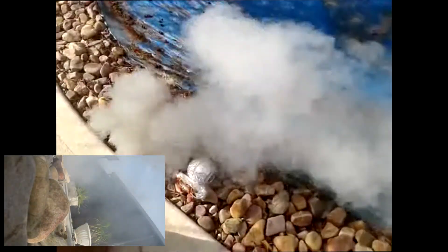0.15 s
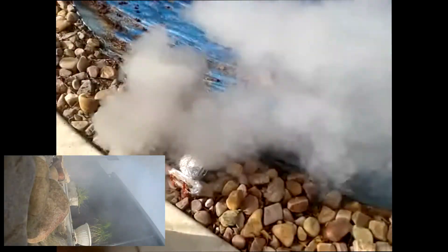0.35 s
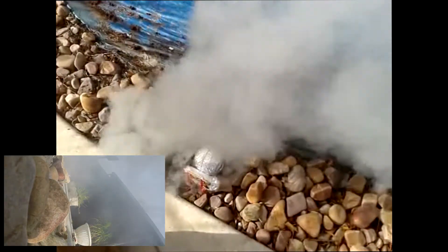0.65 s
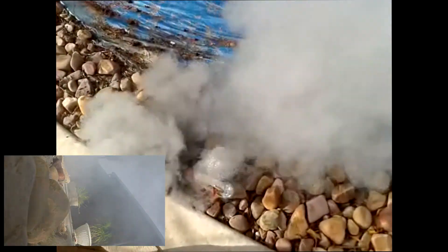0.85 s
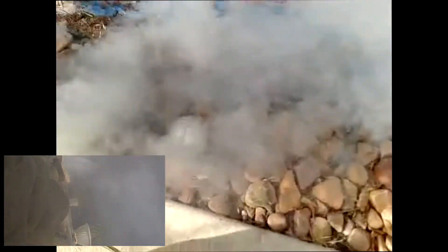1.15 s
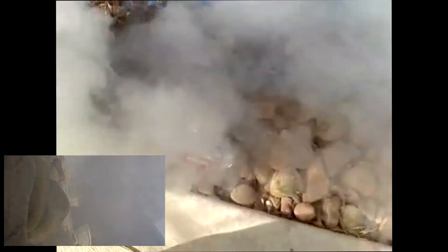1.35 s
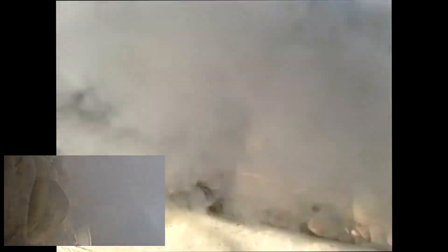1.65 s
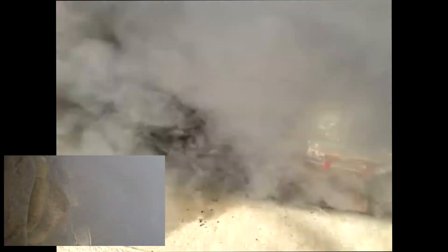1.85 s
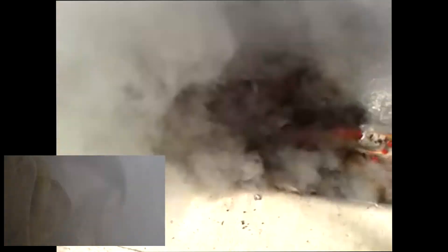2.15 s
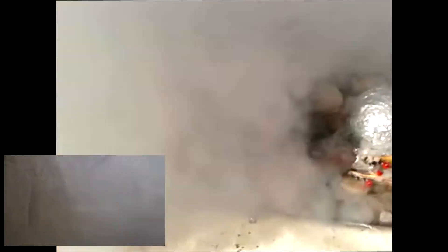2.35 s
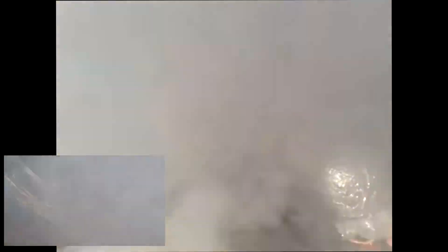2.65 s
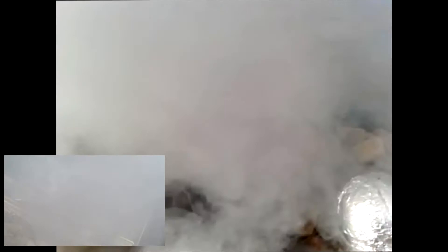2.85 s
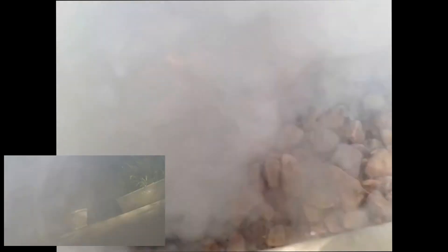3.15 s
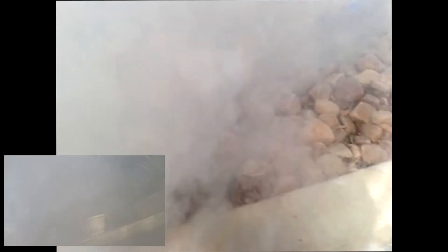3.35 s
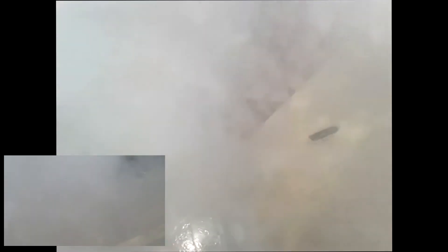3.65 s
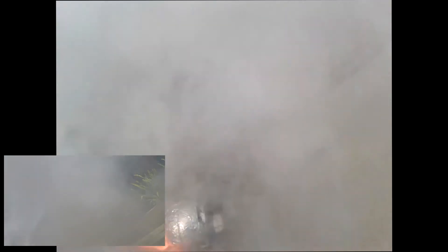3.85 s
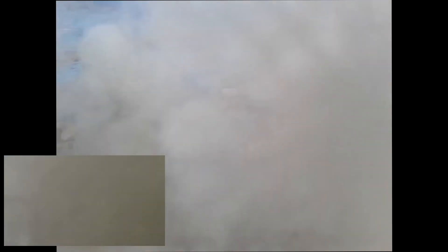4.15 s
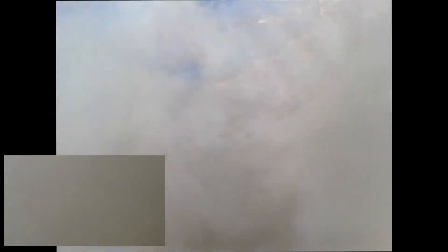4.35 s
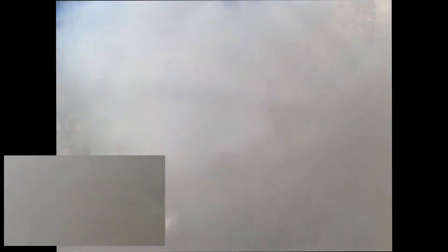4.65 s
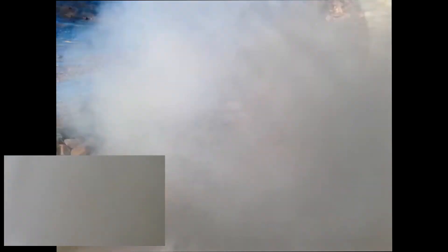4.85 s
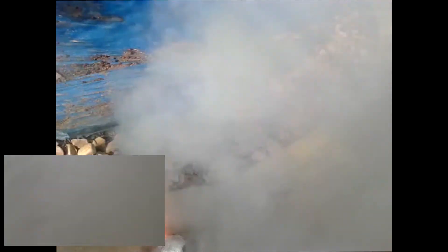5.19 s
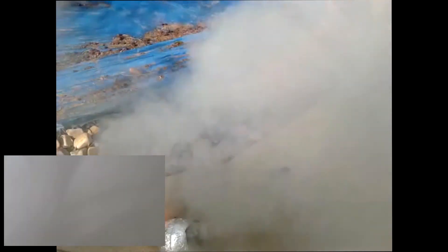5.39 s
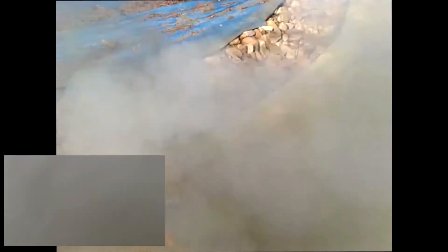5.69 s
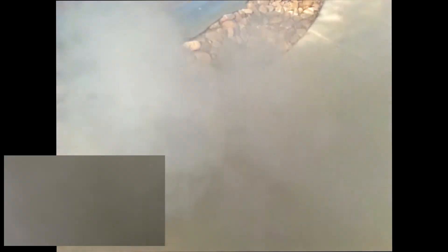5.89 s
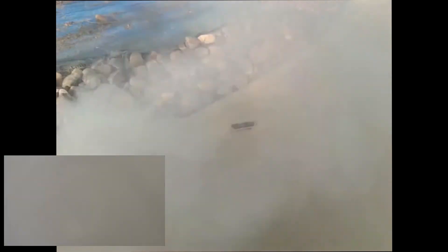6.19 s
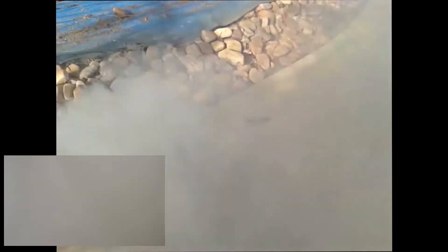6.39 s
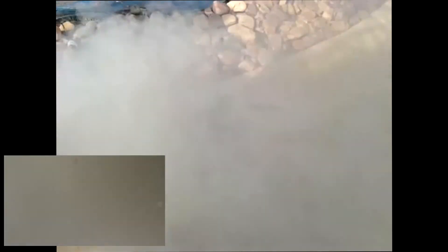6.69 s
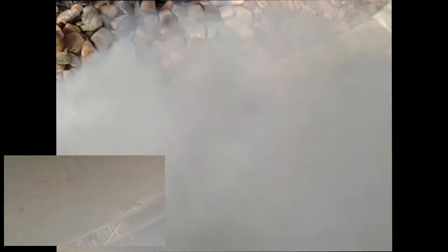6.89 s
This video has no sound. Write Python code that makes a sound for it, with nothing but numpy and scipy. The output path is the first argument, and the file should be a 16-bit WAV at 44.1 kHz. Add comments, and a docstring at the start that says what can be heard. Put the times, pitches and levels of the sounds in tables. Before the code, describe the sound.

A homemade solid-fuel motor roars with rough, grainy hiss near one microphone, dry and outdoors. At first it is even and moderate; then quick spurts, scrapes and wooden bumps break in. Around three seconds a heavy thumping lurch makes it much louder. It keeps blasting with changing hollow or piercing colour and rumbling wheels, then bursts in a hard pop and collapses to a faint, spitting hiss.

```python
"""First comes the hiss of a small solid-fuel rocket motor beside one microphone: crackling noise, coloured
by echoes off paving and stones that change as the board carrying the motor lurches about.
The board rumbles and grinds (shaped noise), scrapes over stone and knocks (short decaying swings).
At the end the motor pops (shaped pressure pulses with a bright noise crack), the jet collapses, and a weak
hiss with a few faint spits (tiny noise bursts) is left."""
import sys
import numpy as np
from scipy import signal
from scipy.fft import rfft, irfft
from scipy.io import wavfile
from scipy.ndimage import uniform_filter1d

SR = 44100
rng = np.random.default_rng(int(sys.argv[2]) if len(sys.argv) > 2 else 0)


def how_loud(loudness_db):
    """Turn decibels into a plain amplitude multiplier (0 dB gives 1, 20 dB gives 10)."""
    steps = np.asarray(loudness_db, float) / 20
    return 10 ** steps


def unload_audio(sound):
    """Save the sound as a 16-bit wav file, at the path given as the first command line argument."""
    columns = np.transpose(np.atleast_2d(sound))
    # keep every value between -1 and 1, then stretch to whole-number steps
    steps = np.round(np.clip(columns, -1, 1) * 32767)
    wavfile.write(sys.argv[1], SR, steps.astype(np.int16))


N = 310023


def jet(flutter_db=0.67, swell_db=0.35, crackle_per_s=350, crackle_db=2.5, spread_db=3.0, patchy_db=0.77):
    """Turbulent gas makes noise with sharp crackle, heard through the reflections of each place in turn."""
    # where the motor stands: move_centre_s, move_time_s, tilt_db_per_octave (as the nozzle turns),
    # casing_share, nozzle_share (how much of each ring is heard)
    places = [(0, .1, -1.85, .3, 0.078), (1.35, 0.78, -1.1, 0, 0.31), (2.3, 0.22, -0.03, 0.32, 0),
              (3.07, 0.049, 0.54, 0.54, 0.21), (3.98, 0.21, -0.86, 0.43, 0.79), (5.2, 0.48, -2, 0, 0.63),
              (5.73, 0.32, -1, 0.32, 1), (6.17, 0.56, -0.55, 0.97, 0.56), (6.69, 0.053, 0.2, 0, 0.2)]
    # strongest reflections near each place, one list a place: delay_ms, signed_strength, top_hz
    reflections = [
        [(0.233, 0.3, 9400), (0.37, 0.64, 1210), (0.473, -0.22, 19000), (0.767, 0.062, 19000),
         (0.803, -0.15, 6900), (0.966, 0.097, 6800), (1.474, 0.18, 8600), (1.571, -0.2, 2040),
         (1.929, -0.29, 1210), (3.207, 0.33, 1200)],
        [(0.243, 0.31, 1200), (0.477, -0.28, 19000), (0.515, 0.26, 4800), (0.681, -0.17, 19000),
         (0.744, 0.17, 19000), (0.977, 0.76, 1200), (1.249, 0.19, 5000), (1.47, 0.68, 1800),
         (1.801, 0.67, 1200), (1.903, -0.53, 1300)],
        [(0.086, 0.48, 3460), (0.223, 0.13, 6800), (0.398, -0.071, 19000), (0.698, -0.2, 5000),
         (0.813, -0.23, 1700), (0.9, 0.29, 4000), (1.167, 0.3, 1400), (1.47, 0.18, 4600), (1.714, 0.28, 1800),
         (2.043, -0.42, 1200)],
        [(0.068, 0.032, 4800), (0.162, -0.34, 1600), (0.351, 0.12, 19000), (0.696, -0.57, 1200),
         (0.994, -0.08, 4700), (1.673, 0.38, 1200), (1.962, 0.072, 1400), (2.136, -0.084, 1200),
         (3.182, 0.22, 1200), (3.593, 0.11, 1600)],
        [(0.078, 0.18, 2500), (0.313, 0.52, 1530), (0.493, 0.3, 12500), (0.653, 0.089, 19000),
         (0.854, 0.33, 1200), (1.169, -0.059, 19000), (1.945, 0.37, 1700), (2.478, 0.32, 1300),
         (2.758, -0.12, 7700), (2.968, 0.17, 1400)],
        [(0.083, -0.3, 6100), (0.186, 0.36, 19000), (0.299, -0.34, 2900), (0.404, 0.54, 1610),
         (0.66, 0.14, 7000), (1.272, -0.29, 1200), (1.554, -0.13, 3800), (1.913, 0.082, 2400),
         (2.125, -0.39, 1300), (2.544, 0.1, 2900)],
        [(0.123, -0.09, 19000), (0.183, 0.47, 8000), (0.317, -0.2, 14200), (0.565, 0.22, 19000),
         (0.698, 0.12, 7100), (1.173, 0.086, 2000), (1.904, 0.13, 3000), (2.023, 0.15, 4300),
         (2.333, -0.19, 1200), (2.496, 0.12, 2400)],
        [(0.109, -0.66, 5800), (0.216, 0.25, 19000), (0.426, 0.3, 16400), (0.443, -0.21, 1300),
         (0.697, 0.14, 19000), (1.651, -0.57, 1200), (1.931, 0.13, 3000), (2.149, -0.32, 5000),
         (2.368, -0.2, 3500), (2.699, -0.32, 2400)],
        [(0.056, 0.5, 19000), (0.131, 0.11, 5200), (0.32, 1, 1400), (0.402, 0.28, 10000), (0.7, 0.43, 2400),
         (0.77, 0.44, 2000), (0.956, -0.33, 2300), (1.088, 0.64, 1200), (1.263, -0.2, 1500),
         (1.917, 0.18, 1200)],
    ]
    gas = rng.standard_normal(N) * how_loud(flutter_db * wander(0.001) + swell_db * wander(0.012))
    crack_db = crackle_db + spread_db * np.minimum(rng.exponential(1, N), 5)
    cracks = (rng.random(N) < crackle_per_s / SR) * how_loud(crack_db)
    hz, frame_s, spectrum = signal.stft(gas + cracks, SR, nperseg=1024, noverlap=768)

    gain = 0
    for index, (place, echoes) in enumerate(zip(places, reflections)):
        centre_s, move_s, tilt_db, casing, nozzle = place
        # the first place holds from the start; each later one fades in over its move
        share = np.clip((frame_s - centre_s) / move_s + .5, 0, 1) if index else np.ones(len(frame_s))
        here = echo_path(hz, echoes, tilt_db, casing, nozzle)[:, None]
        gain = (1 - share) * gain + share * here

    # hot smoke bends the paths: patches of the spectrum drift up and down in level
    smoke = rng.standard_normal(spectrum.T.shape).T
    smoke = uniform_filter1d(smoke, size=10, axis=0)
    smoke = evened(uniform_filter1d(smoke, size=14, axis=1))
    heard = spectrum * gain * how_loud(patchy_db * smoke)
    hiss = signal.istft(heard, SR, nperseg=1024, noverlap=768)[1][:N]
    return evened(hiss) * thrust()


def thrust():
    """Jet amplitude at the microphone: the burn with its spurts, then a collapse to a weak hiss."""
    # jet strength while the fuel burns: time_s, level_db
    burn = [(0, -24.5), (1.0, -24.5), (2.05, -26), (2.4, -25), (2.75, -21.5), (3.04, -23), (3.1, -18.5),
            (3.3, -17), (3.52, -18), (3.62, -16.5), (3.97, -15), (4.06, -16.5), (5.03, -14), (5.45, -15.5),
            (5.55, -12), (5.74, -16.5), (6.2, -16), (6.65, -15)]
    # sudden changes of the jet, mostly spurts: centre_s, boost_db, fall_s
    spurts = [(2.154, 3, 0.01), (2.322, 4.5, 0.011), (2.346, 10, 0.014), (2.425, 5.5, 0.0062),
              (3.323, 6.5, 0.0094), (3.825, 3.5, 0.0045), (3.866, 3, 0.0057), (6.66, -0.5, .006)]
    burnout_s, collapse_s = 6.6625, .0015
    ember_db, ember_extra_db, ember_sink_s, ember_rise_db_per_s = -37, 9, 0.078, 10
    after = np.arange(N) / SR - burnout_s
    burning = .5 - .5 * np.tanh(after / collapse_s)
    burn_db = curve(burn) + sum(db * swell(s, fall_s) for s, db, fall_s in spurts)
    # the weak hiss sinks, then creeps up
    late = np.maximum(after, 0)
    weak_db = ember_db + ember_extra_db * np.exp(-late / ember_sink_s) + ember_rise_db_per_s * late
    return burning * how_loud(burn_db) + (1 - burning) * how_loud(weak_db)


def echo_path(hz, echoes, tilt_db, casing, nozzle):
    """Direct sound and dulled reflections interfere; tube rings and tilt colour the jet at one place."""
    # jet spectrum before rings and tilt: freq_hz, relative_density_db
    jet_spectrum = [(30, -45.), (150, -38.5), (350, -21.5), (800, -3.5), (1500, -2), (2700, -1),
                    (4500, -10), (6000, -15.5), (7500, -21), (9500, -30), (12000, -38.5), (14000, -45),
                    (15000, -58.), (15400, -100.)]
    # ring of the casing: centre_hz, width_hz, height_db (at full share)
    casing_ring = (1093, 99, 14.7)
    # rings of the nozzle: centre_hz, width_hz, height_db (at full share)
    nozzle_rings = [(2206, 200, 15.5), (2863, 540, 11), (4577, 400, 11), (6140, 700, 8)]
    comb = 1
    for delay_ms, strength, top_hz in echoes:
        comb = comb + strength * np.exp(-2j * np.pi * hz * delay_ms / 1000) / (1 + 1j * hz / top_hz)
    rings = [casing_ring] + list(nozzle_rings)
    casing_db, *nozzle_db = (db / (1 + (2 * (hz - f) / width) ** 2) for f, width, db in rings)
    tube_db = max(casing, 0) * casing_db + max(nozzle, 0) * sum(nozzle_db)
    slope_db = tilt_db * np.log2(np.maximum(hz, 350) / 2500)
    gain = abs(comb) * how_loud(spectrum_db(jet_spectrum, hz) + tube_db + slope_db)
    return gain / np.linalg.norm(gain[(hz > 900) & (hz < 7000)])  # unit power in the main band


def pops():
    """Each pop is suction, a sharp push of air, then about two cycles of the tube ringing."""
    # pressure pops as the burn ends: time_s, pulse_scale, tube_ring_hz
    pop_list = [(6.6784, 1.3, 300), (6.7045, .24, 135)]
    t, out = np.arange(-1300, 1301) / SR, np.zeros(N)
    for s, scale, hz in pop_list:
        u = t * hz  # time in cycles of the ring
        push = .85 * np.exp(-abs(u / .115))
        suction = .23 * np.exp(-((u + .7) / .36) ** 2)
        ring_window = np.exp(-(u / np.where(u < 0, .25, 1.9)) ** 6)
        ring = (.13 * np.cos(2 * np.pi * u) - .05) * ring_window
        add(out, s + t[0], scale * (push - suction + ring))
    return out


def crack_and_spits():
    """The bright crack of the pop, then faint spits in the weak hiss: noise bursts gone in milliseconds."""
    # the pop's crack in the first row, then the spits: start_s, level_db (before decay and band filter)
    burst_list = [(6.678, -26), (6.778, -52), (6.8248, -38), (6.8318, -44), (6.8888, -50), (6.948, -44),
                  (6.9945, -50), (7.017, -48)]
    t, out = np.arange(200) / SR, np.zeros(N)
    bursts = rng.standard_normal((len(burst_list), len(t)))
    for (s, db), burst in zip(burst_list, bursts):
        add(out, s, how_loud(db) * burst * np.exp(-t / .0006))
    band = signal.butter(2, [2500, 10500], "band", fs=SR, output="sos")
    return signal.sosfilt(band, out)


def knocks(deck_hz=240, deck_db=-9, deck_s=0.0019):
    """Each bump is a dull swing of the board, built over part of a cycle, with a brief wooden deck ring."""
    # bumps of the board: start_s, swing_peak_db, pitch_hz
    bumps = [(0.098, -34.5, 70.4), (1.559, -32.5, 109), (2.117, -34, 40.4), (2.17, -30, 67.3),
             (2.212, -32, 41), (2.312, -24, 48), (2.372, -30, 45), (2.411, -24, 94.2), (2.444, -27, 59.2),
             (2.509, -23, 70.0), (2.632, -27, 40.4), (2.72, -25.5, 88.8), (3.062, -20, 167),
             (3.1, -19, 69.4), (3.164, -13, 80.4), (3.184, -18, 45), (3.3, -20, 61.9), (3.384, -16.5, 87),
             (3.581, -35, 66.7), (3.859, -19, 201), (3.879, -21, 170), (4.045, -26, 44),
             (4.047, -25.5, 110), (5.526, -28, 40.4), (5.645, -29.5, 39), (6.745, -34, 200)]
    cycles = 1.43  # sets how many cycles each swing lasts
    out = np.zeros(N)
    spots = rng.uniform(0.69, 1.4, len(bumps))  # each bump scales the deck pitch
    for (s, db, hz), spot in zip(bumps, spots):
        t = np.arange(0, 4 * cycles / hz, 1 / SR)
        swing = np.sin(2 * np.pi * hz * t) * hz * t * np.exp(-3.5 * hz * t / cycles)
        deck_envelope = np.e * t / deck_s * np.exp(-t / deck_s)
        deck = np.sin(2 * np.pi * deck_hz * spot * t) * deck_envelope
        add(out, s, how_loud(db) * (swing / abs(swing).max() + how_loud(deck_db) * deck))
    return out


def rolling(lumpy_db=3.5, gritty_db=-0.86):
    """Wheels on rough paving shake the board into lumpy rumble and grinding; stone gives short scrapes."""
    # how hard the board rolls or shakes: time_s, rumble_db
    roll = [(0, -50), (2.07, -54.5), (2.12, -49), (3.0, -46), (3.1, -33.5), (3.4, -34), (3.5, -43),
            (4.5, -43.5), (4.85, -39.5), (5.5, -39.5), (6.2, -36.5), (6.62, -37), (6.72, -51), (7.03, -46)]
    # wheels and deck grinding on the paving: time_s, grinding_db
    grinding = [(0, -55.5), (2.07, -41.5), (3.0, -39.5), (3.2, -29), (3.42, -24.5), (3.52, -36.5),
                (3.6, -25), (4.0, -32.5), (4.1, -37.5), (5.5, -35.5), (6.2, -34), (6.6, -42), (6.7, -47),
                (7.03, -55)]
    # lurches of the board: centre_s, added_rumble_db, added_grinding_db, fall_s
    lurches = [(2.165, -63, -41, 0.023), (2.324, -35.5, -31, 0.037), (2.413, -35, -52, 0.023),
               (2.52, -35, -42, 0.018), (2.636, -42, -48, 0.029), (2.72, -53, -40, 0.016),
               (2.883, -47.5, -50, 0.042), (3.128, -29, -16.5, 0.039), (3.22, -46, -56, 0.027),
               (3.38, -40, -32, 0.023), (3.573, -52, -38, 0.05), (3.85, -44, -31, 0.022),
               (4.066, -42, -63, 0.028), (6.637, -41, -34, .02), (6.709, -34, -57, 0.017)]
    # the deck scrapes over a stone: centre_s, level_db, fall_s
    scrapes = [(2.318, -14.5, 0.0062), (2.347, -12, 0.015), (2.427, -23, 0.0036), (3.14, -26, 0.038)]
    # spectra of rumble, grinding and scrape: freq_hz, relative_density_db
    rumble_spectrum = [(12, -21), (20, -2.5), (70, 0), (211, 0), (300, 0), (390, -28), (660, -120)]
    grind_spectrum = [(100, -10.5), (200, -6.5), (300, -2.5), (430, 2.5), (600, 0.5), (900, -13),
                      (1500, -55), (3000, -81)]
    scrape_spectrum = [(150, -26), (450, -7), (950, 3), (1400, -10), (3000, -10), (6000, -26.5),
                       (10000, -63), (15000, -90)]
    shake = how_loud(curve(roll)) + sum(how_loud(db) * swell(s, fall_s) for s, db, _, fall_s in lurches)
    drag = how_loud(curve(grinding)) + sum(how_loud(db) * swell(s, fall_s) for s, _, db, fall_s in lurches)
    strokes = sum(how_loud(db) * swell(s, fall_s) for s, db, fall_s in scrapes)
    rumble = coloured(rumble_spectrum) * shake * how_loud(lumpy_db * wander(0.014))
    grind = coloured(grind_spectrum) * drag * how_loud(gritty_db * wander(0.0024))
    scrape = coloured(scrape_spectrum) * strokes * how_loud(1.4 * wander(0.0017))
    return rumble + grind + scrape


def evened(x):
    """Scales to rms 1."""
    return x / np.sqrt(np.mean(x ** 2) + 1e-20)


def spectrum_db(points, hz):
    """Reads a spectrum table on a log-frequency axis."""
    f, value = np.transpose(points)
    return np.interp(np.log(hz + 1), np.log(f + 1), value)


def curve(rows):
    """Second column of a timed table, interpolated at every sample."""
    rows = np.asarray(rows)
    return np.interp(np.arange(N) / SR, rows[:, 0], rows[:, 1])


def wander(seconds):
    """Smooth random drift of rms 1: noise through two equal one-pole lowpasses of the given time."""
    r = np.exp(-1 / (seconds * SR))
    return evened(signal.lfilter([1], np.convolve([1, -r], [1, -r]), rng.standard_normal(N)))


def coloured(points):
    """Steady noise of rms 1 with a given spectrum."""
    gain = how_loud(spectrum_db(points, np.fft.rfftfreq(N, 1 / SR)))
    return evened(irfft(rfft(rng.standard_normal(N)) * gain, N))


def swell(s, fall_s):
    """A bell in time, rising a little faster than it falls."""
    t = np.arange(N) / SR - s
    return np.exp(-(t / np.where(t < 0, 0.86 * fall_s, fall_s)) ** 2)


def add(mix, s, sound):
    """Mixes a sound in at a time in seconds."""
    part = mix[max(round(s * SR), 0):][:len(sound)]
    part += sound[:len(part)]


def scene():
    """One microphone feeds both channels."""
    mono = jet() + pops() + crack_and_spits() + knocks() + rolling()
    return np.array([mono, mono])


def low_pass(x):
    """Removes everything above the highest recorded frequency."""
    return signal.sosfilt(signal.butter(12, 15330, fs=SR, output="sos"), x)


def record(dry):
    """The microphone signal meets a hard ceiling just under full scale."""
    mix = np.clip(dry, -.99, .99)
    return low_pass(mix)


dry = scene()
out = record(dry)
unload_audio(out)
```